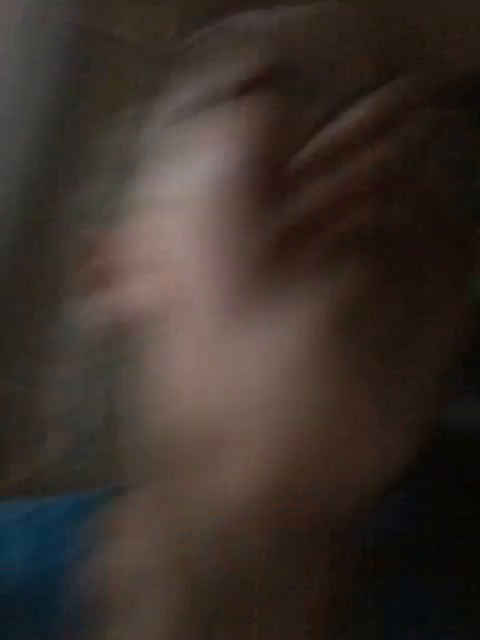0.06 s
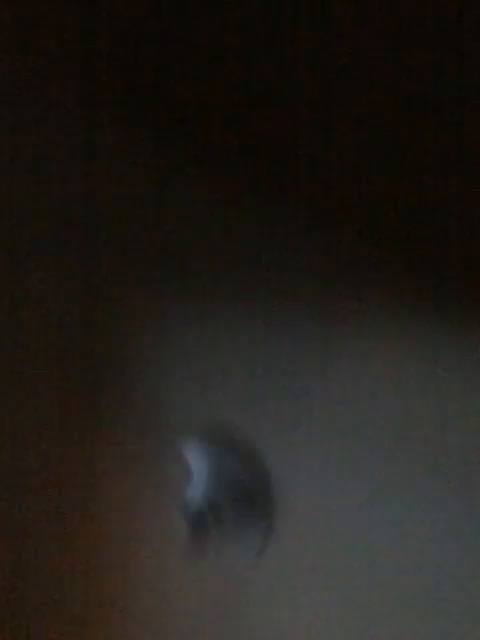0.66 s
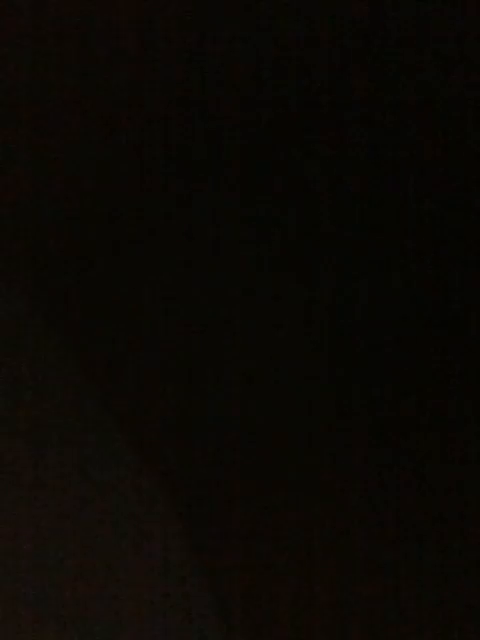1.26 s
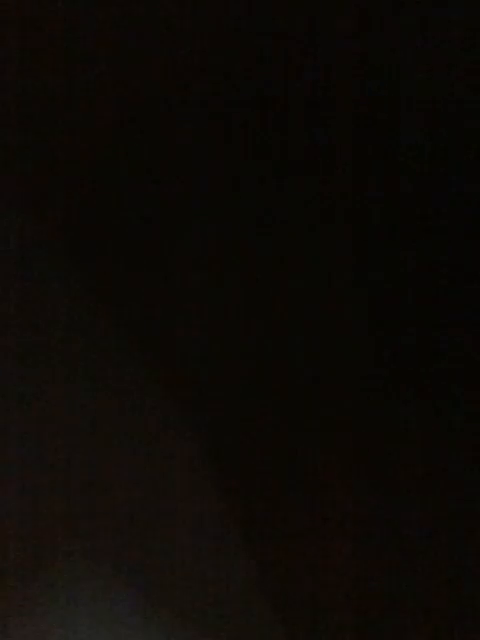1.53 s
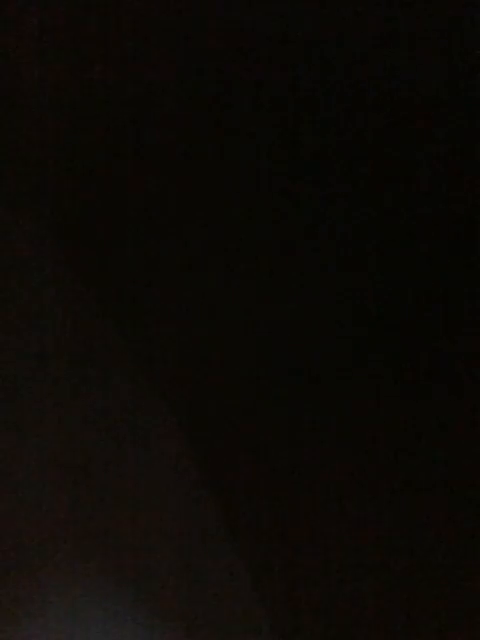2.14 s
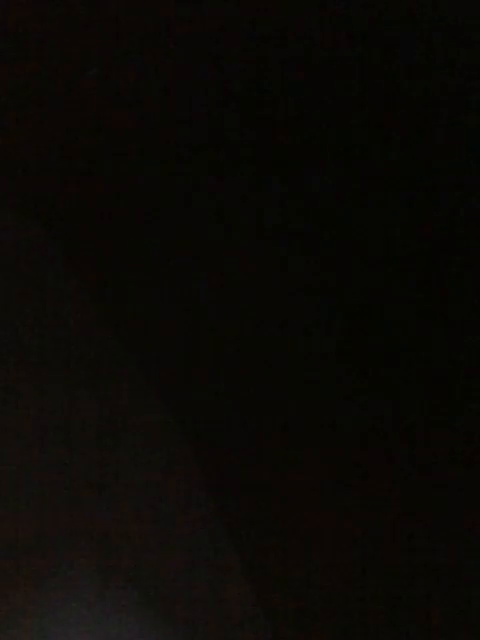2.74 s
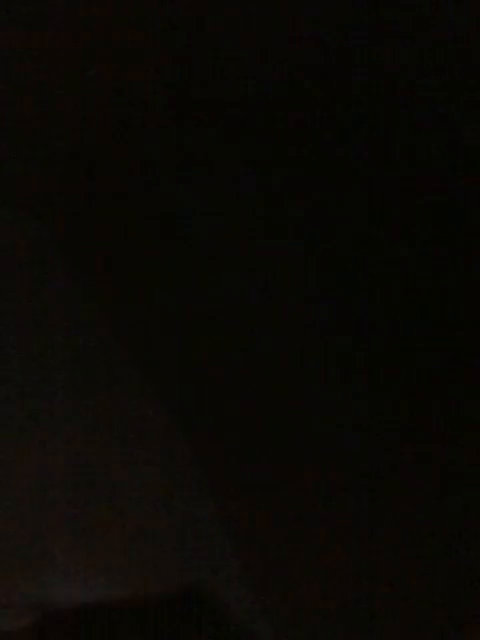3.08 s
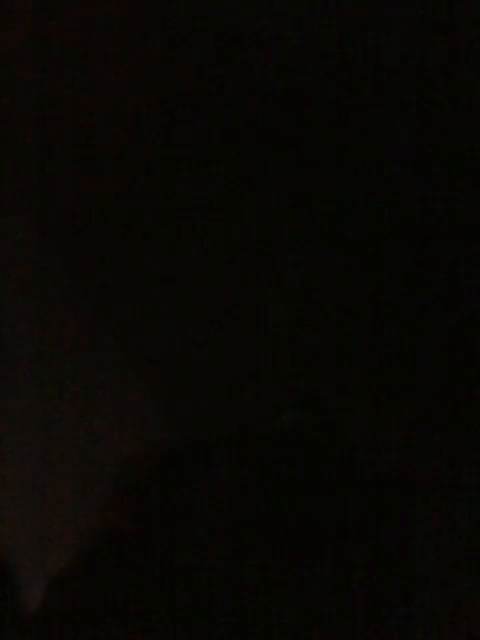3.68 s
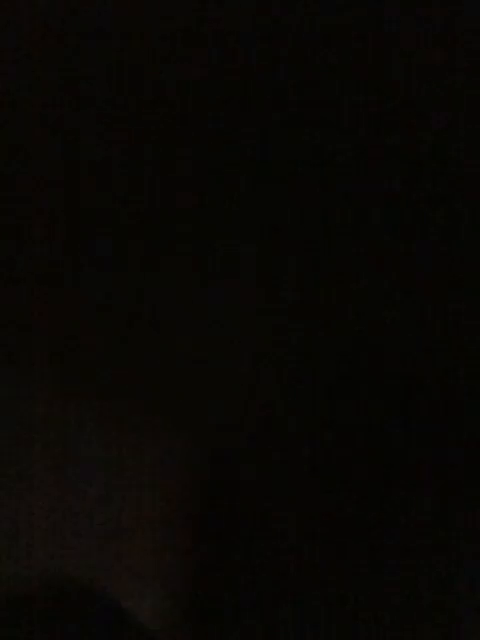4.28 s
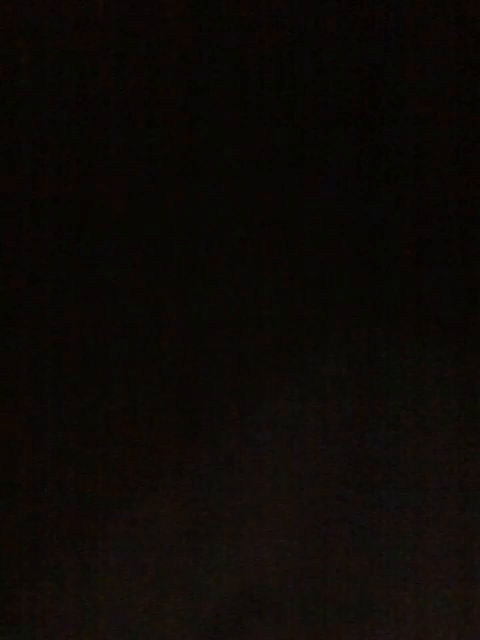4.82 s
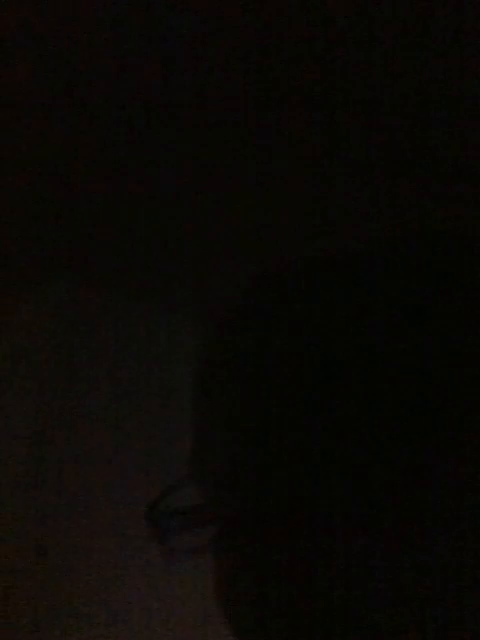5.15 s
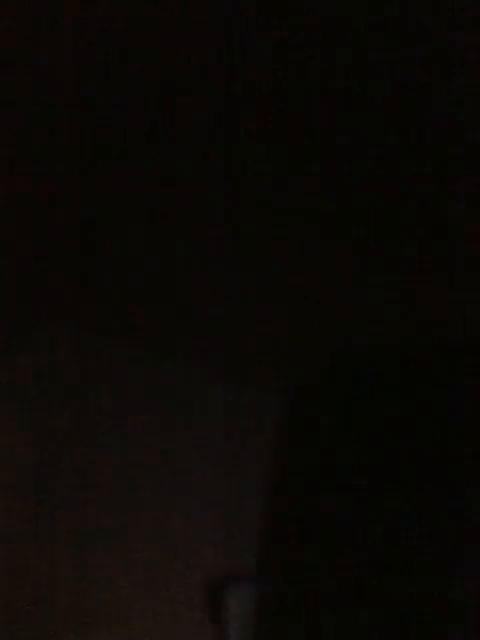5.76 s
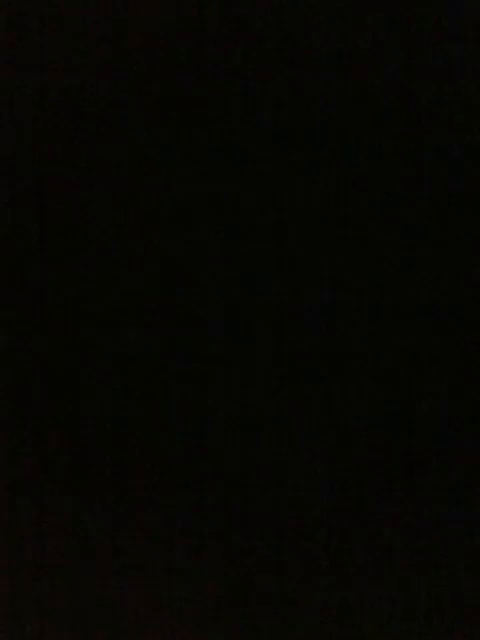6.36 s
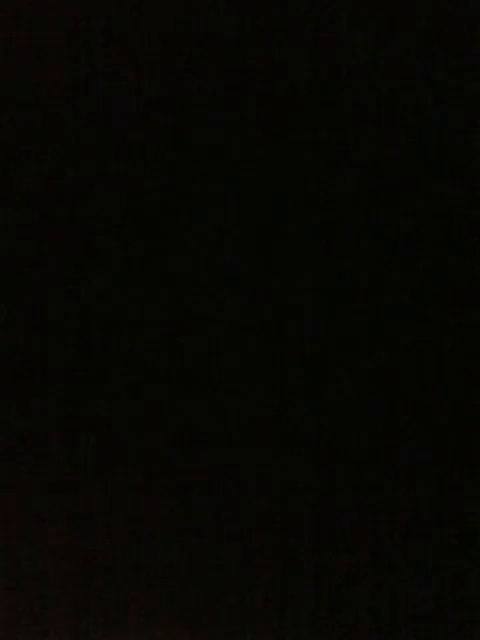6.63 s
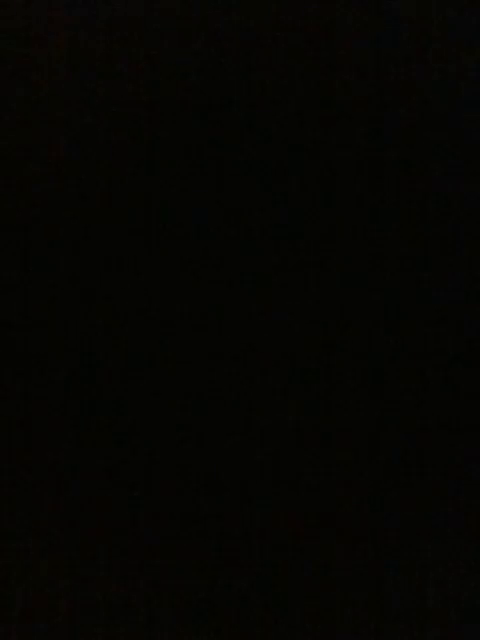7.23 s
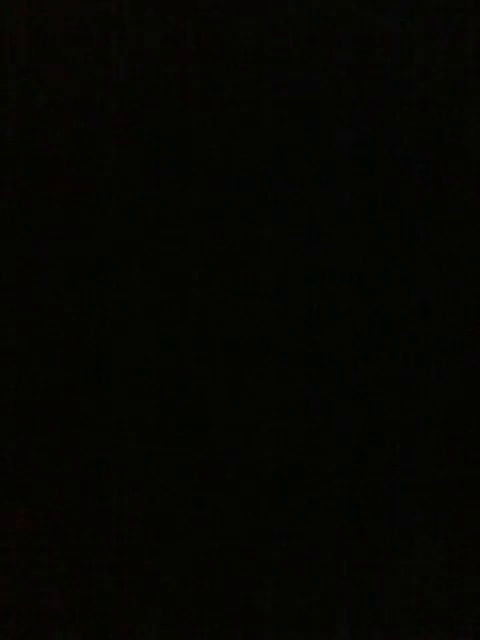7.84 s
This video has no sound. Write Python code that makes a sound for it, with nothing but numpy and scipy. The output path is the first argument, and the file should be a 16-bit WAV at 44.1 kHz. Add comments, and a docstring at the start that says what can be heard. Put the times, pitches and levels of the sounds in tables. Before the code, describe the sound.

Someone climbs into an attic with a phone in hand. Close, dry taps and scratchy swipes on its case come first, mixed with dull thuds on timber. The ladder creaks a little farther off, then a second burst of rubbing and knocking ends in a short squeak of wood. Softer sleeve rustles and taps die away before some last low bumps, over a faint hum and hiss.

```python
"""Knocks and rubs on a phone's case, right at the microphone, as someone climbs into an attic. Fingers tap the
case, which chatters and rings; cloth and skin drag over it and chirp in stick-slip. Hands, knees, feet and the
phone itself thump on ladder and joists, ringing the timber's modes. Loaded joints creak in separate slips, and
one locks into a squeak. A faint low hum and hiss swell and sink underneath."""
import sys
import numpy as np
from scipy import signal
from scipy.fft import rfft, irfft, next_fast_len
from scipy.io import wavfile
from scipy.ndimage import uniform_filter1d

SR = 44100
rng = np.random.default_rng(int(sys.argv[2]) if len(sys.argv) > 2 else 0)


def bounce(signal):
    """Save signal as a 16-bit WAV file at the path given by the first command-line argument."""
    frames = np.transpose(np.atleast_2d(signal))
    limited = np.clip(frames, -1, 1)
    pcm = np.round(limited * 32767).astype(np.int16)
    wavfile.write(sys.argv[1], SR, pcm)


N = 348377
TIME = np.arange(N) / SR

# background swell: t/s, hiss/dB, hum/dB
BACKGROUND_LEVELS = [(0, -52, -63.5), (1.0, -61, -47.5), (1.7, -67.5, -55.5), (2.25, -68.5, -58),
                     (2.7, -59.5, -52), (3.4, -53.5, -47), (4.3, -41.5, -51), (4.8, -58, -55),
                     (5.35, -60.5, -50.5), (6.0, -53.5, -58.5), (6.72, -49.5, -59), (6.95, -61, -62.5),
                     (7.55, -62.5, -69.5), (7.85, -51.5, -63)]
# cloth and skin strokes on the case: start/s, length/s, rub/dB, hiss/dB
CASE_STROKES = [(0, 0.053, -35, -34.5), (0.088, 0.14, -35, -31), (0.286, .11, -37.5, -37),
                (0.411, 0.18, -33.5, -33), (0.646, 0.064, -31.5, -31), (0.714, 0.087, -50, -42.5),
                (0.828, 0.12, -45.5, -47.5), (1.185, 0.15, -49.5, -42), (1.267, 0.37, -55, -53.5),
                (3.045, 0.514, -53.5, -55.5), (3.673, 0.1, -45.5, -42), (3.865, 0.076, -31.5, -41.5),
                (3.966, 0.019, -47, -37.5), (4.05, 0.22, -38.5, -36.5), (4.33, 0.23, -39, -36),
                (4.654, 0.11, -46, -41), (4.997, .27, -47, -45.5), (5.304, 0.048, -49.5, -43.5),
                (5.449, 0.21, -51.5, -50.5), (5.785, 0.2, -47.5, -44), (6.057, 0.091, -40.5, -34),
                (6.195, 0.24, -45, -39), (6.348, .13, -34.5, -30), (6.564, 0.058, -40, -36),
                (6.656, 0.1, -41.5, -33)]
# swipes over the microphone port: centre/s, length/s, rub/dB, hiss/dB
PORT_SWIPES = [(0.16, 0.037, -26.5, -42), (0.568, 0.054, -35.5, -40.5), (1.25, 0.013, -21, -29),
               (4.307, 0.025, -17, -16), (4.419, .014, -24, -38.5), (4.44, 0.014, -18, -18.5),
               (6.457, 0.046, -29.5, -28.5)]
# knocks on the case: t/s, contact/s, level/dB, weight/dB re level, sharpness/dB re level
CASE_KNOCKS = [(0.0575, 0.00214, -17, -4, -9), (0.1675, 0.00191, -23.5, -9.5, 9),
               (.247, 0.0027, -27, -12, 8.5), (0.3352, 0.0015, -20, -11.5, -15),
               (.3862, .0011, -18, -19.5, 5.5), (0.5773, .0012, -15.5, -22.5, 0.5),
               (.6263, .0005, -18, 6.5, 3), (.683, 0.0043, -7, -9, 0), (0.691, .0014, -8.5, -6, -7.5),
               (0.7031, 0.0021, -21.5, 8, 2), (0.8212, 0.0017, -31.5, -6.5, 1.5),
               (1.0107, 0.0045, -34.5, -15, 0), (1.039, 0.0024, -10.5, -4.5, 0.5),
               (1.0797, 0.0032, -5, 0.5, -3), (1.117, 0.0055, -19, -1, 2), (1.248, 0.0038, -30, -7, 9.5),
               (1.2614, 0.0017, -23.5, -6, -2.5), (1.302, .0015, -33, 8.5, 1.5),
               (1.319, .0023, -13, -5, 0.5), (1.3276, 0.0037, -15.5, 9, 2), (1.425, .004, -7.5, 0.5, 3.5),
               (1.4811, .0014, -12.5, -7, -4), (1.5322, 0.00074, -24.5, 5, -4),
               (1.5804, 0.00066, -30.5, 4, 2.5), (1.6137, 0.00077, -38, -2, 6.5),
               (1.719, 0.0013, -46, -13.5, -3), (4.043, 0.0012, -22.5, -3.5, 0.5),
               (4.047, 0.0059, -21.5, -21, -6), (4.0894, 0.00084, -19.5, -6, -3.5),
               (4.1058, 0.00053, -17.5, -31, -5.5), (4.392, 0.00049, -16, -16.5, -1),
               (4.4236, 0.0025, -18.5, -4.5, -2.5), (4.474, 0.001, -26, -4.5, -2),
               (4.5851, 0.0029, -5.5, -2, 4), (4.5975, .0013, -15, -2, -2.5),
               (4.6168, 0.0037, -24, 2.5, 4.5), (4.6299, .0015, -22.5, -16, 3),
               (4.6677, 0.0024, -20, -15.5, 2), (4.688, .0014, -13, 1, -3.5),
               (4.7532, 0.0012, -42, -7.5, 9.5), (4.862, 0.0024, -24, -21, 7),
               (5.521, 0.00057, -13.5, -35, -30), (5.6071, 0.0028, -22.5, -1, -6.5),
               (5.702, 0.0012, -26, -9.5, -7), (5.7802, 0.00047, -24.5, -13.5, -9.5),
               (6.0795, 0.0024, -22, -10.5, -9), (6.201, 0.002, -33.5, -18, -4),
               (6.2147, 0.00051, -32, -26, -6), (6.749, 0.0051, -27.5, 6, -6),
               (6.8406, 0.00039, -39, -9.5, -11)]
# fingertip stick-slip: centre/s, length/s, f/Hz, level/dB
FINGER_CHIRPS = [(0.1227, 0.0059, 3835, -5), (0.126, 0.0046, 4300, -17), (0.202, 0.025, 3530, -23.5),
                 (1.252, 0.0091, 1287, -14), (5.978, 0.0041, 287, -21.5), (6.522, 0.0024, 815, -41),
                 (6.538, 0.0031, 880, -28), (6.568, 0.0056, 667, -22.5), (6.628, 0.011, 838, -28),
                 (6.669, 0.0094, 685, -30.5), (6.706, 0.0047, 504, -26.5)]
# blows on the timber, from limbs and from the phone itself: t/s, t60/s, boom f/Hz, boom/dB, wood/dB, crack/dB
TIMBER_BLOWS = [(.688, .17, 127.8, -18.5, -38, -48.5), (1.085, 0.083, 128.7, -29, -33, -45),
                (1.121, 0.24, 85.7, -28, -41, -58), (1.264, 0.17, 115.5, -38.5, -54.5, -52.5),
                (1.335, 0.37, 106.7, -26, -44, -46.5), (1.438, 0.47, 107.5, -26, -21.5, -57.5),
                (1.534, .25, 100.8, -28, -33, -35), (1.84, 0.43, 80.3, -42, -38, -34),
                (1.99, 0.45, 89.8, -48.5, -51.5, -47.5), (2.072, 0.25, 135, -26, -16.5, -34),
                (2.085, 0.4, 115, -26.5, -39, -31), (2.828, .4, 91.7, -33.5, -40, -59),
                (2.966, 0.35, 129, -36, -38.5, -44.5), (3.046, 0.75, 99, -44, -45, -41.5),
                (3.665, 0.19, 70, -37.5, -41.5, -39), (3.895, 1, 125, -33, -34.5, -42),
                (3.955, .15, 90, -28, -58, -66.5), (4.046, 0.58, 85, -22.5, -31, -42),
                (4.173, 0.81, 90, -29, -27.5, -53.5), (4.388, 0.083, 95, -31.5, -32, -48.5),
                (4.592, 0.16, 121, -15.5, -19.5, -45), (4.672, 0.12, 186.4, -24, -25.5, -35.5),
                (4.888, 0.11, 110, -27.5, -13.5, -40.5), (4.899, 0.3, 110.2, -24, -15, -30.5),
                (6.752, 0.087, 134.6, -45, -49, -67), (7.14, 0.51, 50, -58, -71, -80.5),
                (7.63, 0.48, 151, -35, -34.5, -53.5), (7.771, 0.52, 163, -31, -29, -48.5),
                (7.84, 0.21, 163, -30.5, -32.5, -66)]
# slip runs of a ladder joint: start/s, length/s, first gap/s, gap ratio per slip, level/dB
SLIP_RUNS = [(2.086, .1, .018, 1.0, -26), (2.362, .15, 0.061, 1.13, -47.5), (3.054, .025, 0.017, 1.0, -38),
             (3.14, .1, .0185, .92, -32.5), (3.262, .135, .0102, 1.115, -34),
             (3.404, .06, 0.019, 0.94, -34.5)]
# squeak of a rubbing joint: t/s, f/Hz, level/dB
SQUEAK_PATH = [(4.972, 620, -40), (4.986, 670, -25), (5.02, 720, -23), (5.04, 915, -22), (5.065, 992, -22),
               (5.09, 955, -29), (5.15, 890, -52)]
# timber's radiation of the squeak: f/Hz, gain/dB
SQUEAK_RESPONSE = [(600, -9.5), (950, -2.5), (1400, -5), (1900, -5), (2900, -17), (3900, -19.5),
                   (4700, -16.5), (5900, -29)]

# modes of timber and ladder joint: f/Hz, level/dB, t60/s
TIMBER_MODES = [(60.6, -6, 0.56), (74.6, -11.5, 0.67), (87.38, -9.5, 0.15), (112, -9, 0.25),
                (130.7, -0.5, 0.13), (146.4, -8, 0.59), (192, -6.5, 0.41), (244.9, 0.5, 0.37),
                (275.6, -5.5, 0.38), (327.7, -2, 0.23), (401, -9.5, 0.37), (452.7, 1.5, 0.046),
                (503, -2.5, 0.17), (727, -10.5, 0.32), (872, -3, 0.12), (1038, 0.5, .15), (1203, -5.5, .14),
                (1739, -18, 0.19), (2040, -12.5, .2)]
JOINT_MODES = [(203.5, -11.5, 0.068), (293, -8, 0.052), (474, -5.5, 0.035), (968, 0, 0.037),
               (1131, -7.5, 0.038), (1275, -10, 0.025), (1620, -22, 0.0098), (1970, -21.5, .015),
               (2715, -28.5, 0.0083), (3950, -4, 0.01), (4470, -4.5, 0.0162), (5130, -18.5, 0.013)]

# noise spectra: f/Hz, relative density/dB
BACKGROUND_SPECTRUM = [(25, -7), (60, -6), (80, -6.5), (135, -11), (200, -21), (400, -19.5), (750, -22.5),
                       (1000, -25), (3000, -29.5), (4100, -24), (5500, -30.5), (10000, -31.5), (16000, -33)]
RUB_SPECTRUM = [(100, -17), (400, -7), (680, -1), (1050, -6), (1700, -5), (2400, -8.5), (3400, -22)]
HISS_SPECTRUM = [(1500, -20.5), (2800, -4), (3800, 1.5), (4800, 5.5), (6000, -5), (8500, -12.5),
                 (12000, -19), (16000, -27)]
SWIPE_SPECTRUM = [(150, -5), (500, -4.5), (1300, -1.5), (2200, -9), (3200, -14.5)]
CASE_SPECTRUM = [(70, 0), (250, 7), (600, 9), (1000, -9), (1700, -2.5), (2700, -1), (3700, -2), (4900, 0.5),
                 (6000, -10.5), (8500, -13.5), (12000, -18.5), (16000, -13)]
WOOD_SPECTRUM = [(50, 0.5), (120, 4), (250, -3), (500, -11), (1000, -12), (2500, -18), (4500, -12.5),
                 (6500, -29.5), (12000, -42)]
RUMBLE_SPECTRUM = [(25, -5), (55, 4), (105, 2), (170, -8), (350, -11.5)]
ATTIC_SPECTRUM = [(80, 7.5), (1000, -4), (5000, -8), (12000, -11)]


def from_db(db):
    """Decibels to gain."""
    return 10 ** (np.asarray(db) / 20)


def unit_rms(x):
    """Scale to unit power."""
    return x / np.sqrt(np.mean(x ** 2) + 1e-20)


def per_sample(rows):
    """Interpolate each column of a time curve."""
    times_s, *columns = np.transpose(rows)
    return [np.interp(TIME, times_s, column) for column in columns]


def add(out, at_s, sound):
    """Mix a sound in at a time."""
    i = max(0, round(at_s * SR))
    out[i:i + len(sound)] += sound[:max(0, N - i)]


def band(x, low_hz, high_hz):
    """Band-pass."""
    edges_hz = [low_hz, min(high_hz, SR / 2 - 1000)]
    return signal.sosfilt(signal.butter(2, edges_hz, "band", fs=SR, output="sos"), x)


def dulled(x, top_hz):
    """Low-pass: a softer contact carries less treble."""
    return signal.lfilter(*signal.butter(2, min(top_hz, SR / 2 - 1000), fs=SR), x)


def coloured(x, spectrum):
    """Shape noise to a spectrum, rolled off past its ends; unit power."""
    hz, db = np.transpose(spectrum)
    size = next_fast_len(len(x))
    bin_hz = np.arange(size // 2 + 1) * SR / size + 1e-3
    gain = from_db(np.interp(np.log(bin_hz), np.log(hz), db))
    skirts = np.minimum(1, bin_hz / hz[0]) ** 2 * np.minimum(1, hz[-1] / bin_hz) ** 2
    return unit_rms(irfft(rfft(x, size) * gain * skirts, size)[:len(x)])


def drift(rate_hz):
    """Random wander; unit power."""
    return unit_rms(np.interp(TIME * rate_hz, np.arange(40000), rng.standard_normal(40000)))


def balance(parts, levels_db, span_s):
    """Sum the parts of a blow, each set to its RMS level over the first span_s."""
    return sum(from_db(db) * part / np.sqrt(np.mean(part[:int(span_s * SR)] ** 2) + 1e-20)
               for part, db in zip(parts, levels_db))


def struck(modes, t, scatter_db=3):
    """Decaying modes, with a new strength and sign on every blow."""
    hz, db, t60_s = np.transpose(modes)[:, :, None]
    strength = from_db(db + scatter_db * rng.standard_normal(hz.shape)) * rng.choice([-1, 1], hz.shape)
    return np.sum(strength * from_db(-60 * t / t60_s) * np.sin(2 * np.pi * hz * t), axis=0)


def background(hum_hz=102, whine_hz=4000, whine_re_hiss_db=-16):
    """Hiss, a low hum and a faint high whine that sink and swell."""
    hiss_db, hum_db = per_sample(BACKGROUND_LEVELS)
    hum = unit_rms(band(rng.standard_normal(N), hum_hz - 5, hum_hz + 5))
    whine = unit_rms(band(rng.standard_normal(N), whine_hz - 12, whine_hz + 12))
    hiss = coloured(rng.standard_normal(N), BACKGROUND_SPECTRUM)
    return from_db(hum_db) * hum + from_db(hiss_db) * (hiss + from_db(whine_re_hiss_db) * whine)


def stroke_envelopes(attack_share=0.12, release_s=0.018, rub_slope_db=-3.5, hiss_slope_db=-2.5):
    """Rub and hiss gains: each stroke sets in, eases as it slides, and lets go."""
    rub_env, hiss_env = np.zeros(N), np.zeros(N)
    for start_s, length_s, rub_db, hiss_db in CASE_STROKES:
        t = TIME[:int((length_s + .25) * SR)]
        attack = 1 - np.exp(-t / (attack_share * length_s))
        shape = attack * np.exp(-np.maximum(t - length_s, 0) / release_s)
        progress = np.minimum(t / length_s, 1) - .5
        add(rub_env, start_s, shape * from_db(rub_db + rub_slope_db * progress))
        add(hiss_env, start_s, shape * from_db(hiss_db + hiss_slope_db * progress))
    return rub_env, hiss_env


def friction(spectrum, grain_db, flutter_db):
    """Fibres catch and let go: grainy noise under uneven pressure."""
    grains = rng.standard_normal(N) * from_db(grain_db * drift(1500))
    return unit_rms(coloured(grains, spectrum) * from_db(flutter_db * drift(110)))


def rubbing(rub_env, hiss_env, rub_trim_db=-0.5, hiss_trim_db=-2):
    """Sleeve and fingers drag over the case and swipe across the port."""
    swipe_env = 0
    for centre_s, length_s, rub_db, hiss_db in PORT_SWIPES:
        flat_top = 1 / (1 + (2 * (TIME - centre_s) / length_s) ** 4)
        swipe_env = swipe_env + from_db(rub_db) * flat_top
        hiss_env = hiss_env + from_db(hiss_db) * flat_top
    rub = rub_env * friction(RUB_SPECTRUM, grain_db=0.5, flutter_db=5)
    swipe = swipe_env * friction(SWIPE_SPECTRUM, grain_db=-2.5, flutter_db=5.5)
    hiss = hiss_env * friction(HISS_SPECTRUM, grain_db=2, flutter_db=4)
    return from_db(rub_trim_db) * rub + swipe + from_db(hiss_trim_db) * hiss


def rumble(rub_env, settle_s=0.21, full_rub_db=-22.5, exponent=0.59):
    """The hand shakes the phone, more so the harder it rubs."""
    effort = np.maximum(uniform_filter1d(rub_env, int(settle_s * SR)), 1e-6)
    return from_db(full_rub_db) * effort ** exponent * coloured(rng.standard_normal(N), RUMBLE_SPECTRUM)


def rebounds(above_db=-17, gap_s=0.0035, loss_db=11.5, extra_weight_db=3.5):
    """Hard knocks land a second time, softly; rows as in CASE_KNOCKS."""
    return [(at_s + contact_s / 2 + gap_s, contact_s / 2, db - loss_db,
             weight_db + extra_weight_db, sharp_db)
            for at_s, contact_s, db, weight_db, sharp_db in CASE_KNOCKS
            if db > above_db and contact_s > .0013]


def snags(hiss_env, tries=70, re_hiss_db=-4.5, spread_db=5, contact_s=0.00087, weight_db=-5):
    """Seams catch on the case at random during strokes; rows as in CASE_KNOCKS."""
    samples = rng.integers(0, N, tries)
    offsets_db = rng.normal(re_hiss_db, spread_db, tries)
    return [(i / SR, contact_s, 20 * np.log10(hiss_env[i]) + offset_db, weight_db, 0)
            for i, offset_db in zip(samples, offsets_db) if hiss_env[i] > 1e-4]


def knocks(hiss_env, ring_db=-24, ring_t60_s=0.0087, body_t60_s=.011, band_ratio=1.846,
           lead_s=.003, trim_db=-1, body_trim_db=-2):
    """A touch presses in and chatters on the case; brief ones are crisp, the body rings longest."""
    out, t = np.zeros(N), TIME[:SR // 16] - lead_s
    for at_s, contact_s, db, weight_db, sharp_db in list(CASE_KNOCKS) + rebounds() + snags(hiss_env):
        body_db, click_db = db + weight_db + body_trim_db, db + sharp_db
        ring_hz = 1019 * 2 ** (-weight_db / 24)   # a heavier touch damps the case: lower ring
        force_db = (body_db + click_db) / 2
        top_hz = 9300 * 2 ** ((force_db + 25) / 43)   # a firmer touch reaches higher
        rise_s = 0.00031 + 0.29 * contact_s
        press = np.exp(np.minimum(t / rise_s - 1, 0))
        noise = press * coloured(rng.standard_normal(len(t)), CASE_SPECTRUM)
        after_s = np.maximum(t - contact_s * 0.89, 0)
        contact_decay = from_db(-60 * after_s / (0.001 + contact_s))
        chatter = noise * (contact_decay + from_db(ring_db - 60 * after_s / ring_t60_s))
        body = band(noise * from_db(-60 * after_s / body_t60_s), 66, 550)
        ring = band(chatter, ring_hz / band_ratio, ring_hz * band_ratio)
        click = dulled(band(chatter, 2500, 15000), top_hz)
        knock = balance((body, ring, click), (body_db, db, click_db), lead_s + contact_s + 0.00047)
        add(out, at_s - lead_s, from_db(trim_db) * knock)
    return out


def chirps(jitter=.085):
    """Skin grips and slips briefly at a wavering pitch."""
    out = np.zeros(N)
    clock_s = TIME + jitter * np.cumsum(drift(1200)) / SR
    grip = from_db(3 * drift(900) - 1)
    for centre_s, length_s, hz, db in FINGER_CHIRPS:
        span = np.abs(TIME - centre_s) < 2 * length_s
        envelope = from_db(db) * np.exp(-3.4 * ((TIME[span] - centre_s) / length_s) ** 2)
        out[span] += envelope * np.sin(2 * np.pi * hz * clock_s[span])
    return out * grip


def thumps(modes_db=-4, crack_t60_share=0.33, tail_db=-22, tail_t60_s=0.33, crack_tail_t60_s=0.62,
           rise_s=.0015, band_ratio=1.6):
    """A blow rings the timber's main and lesser modes; the crack drops fast to a faint bright tail."""
    out, t = np.zeros(N), TIME[:SR // 2]
    for at_s, t60_s, boom_hz, boom_db, wood_db, crack_db in TIMBER_BLOWS:
        hardness_db = (wood_db + crack_db) / 2 - boom_db
        top_hz = max(500, 1800 * 2 ** (hardness_db / 5.5))   # softer blows are duller
        lesser = coloured(rng.standard_normal(len(t)), WOOD_SPECTRUM) * np.minimum(t / rise_s, 1)
        modes = from_db(modes_db - 20 * t / t60_s) * struck(TIMBER_MODES, t)
        body = modes + lesser * (from_db(-60 * t / t60_s) + from_db(tail_db - 60 * t / tail_t60_s))
        boom = band(body, boom_hz / band_ratio, boom_hz * band_ratio)
        wood = dulled(band(body, 180, 1900), top_hz)
        crack_decay = from_db(-60 * t / (t60_s * crack_t60_share))
        crack_tail = from_db(tail_db - 60 * t / crack_tail_t60_s)
        crack = band(lesser * (crack_decay + crack_tail), 1700, 11000)
        add(out, at_s, balance([boom], [boom_db], span_s=.05))
        add(out, at_s, balance((wood, crack), (wood_db, crack_db), span_s=0.014))
    return out


def slips(onset_db=-2, onset_s=0.011, scatter_db=3.5, fade_db=1.03):
    """A loaded joint slips in runs, each slip relieving it and weakening the next; yields t/s, dB."""
    for start_s, length_s, gap_s, gap_ratio, db in SLIP_RUNS:
        at_s = start_s
        while at_s < start_s + length_s:
            held_db = onset_db * np.exp((start_s - at_s) / onset_s)   # load still building
            yield at_s, db + held_db + scatter_db * rng.standard_normal()
            at_s += gap_s * rng.normal(1, .02)
            gap_s = max(gap_s * gap_ratio, .005)
            db -= fade_db


def creaks(ring_db=-3, snap_db=-2, snap_t60_s=0.011, timber_db=-16):
    """Each slip is a dry snap that rings the joint's modes and shakes the timber."""
    out, t = np.zeros(N), TIME[:SR // 4]
    for at_s, db in slips():
        snap = band(rng.standard_normal(len(t)) * from_db(-60 * t / snap_t60_s), 450, 4000)
        ring = struck(JOINT_MODES, t)
        shake = band(struck(TIMBER_MODES, t), 40, 220)
        add(out, at_s, balance((ring, snap), (db + ring_db, db + snap_db), span_s=0.0007))
        add(out, at_s, balance([shake], [db + timber_db], span_s=0.017))
    return out


def squeak(lock_s=5.07, rasp_s=.1, jitter=0.136, shimmer_db=6, trim_db=-0.5,
           judder_s=5.078, judder_width_s=0.04, judder_db=-35):
    """Stick-slip locks from a rasp into a rising, falling tone; the board judders as it lets go."""
    hz, level_db = per_sample(SQUEAK_PATH)
    roughness = np.minimum(.05 + ((TIME - lock_s) / rasp_s) ** 2, .9)
    phase = 2 * np.pi * np.cumsum(hz * (1 + jitter * roughness * drift(900))) / SR
    response_hz, response_db = np.transpose(SQUEAK_RESPONSE)
    tone = np.zeros(N)
    for k in range(1, 7):
        harmonic_db = np.interp(k * hz, response_hz, response_db) + shimmer_db * roughness * drift(400)
        tone += from_db(harmonic_db) * np.sin(k * phase)
    letting_go = np.exp(-np.minimum(((TIME - judder_s) / judder_width_s) ** 2, 50))
    judder = from_db(judder_db) * letting_go * unit_rms(band(rng.standard_normal(N), 180, 430))
    sliding = (TIME > SQUEAK_PATH[0][0]) & (TIME < SQUEAK_PATH[-1][0])
    return judder + tone * from_db(trim_db + level_db - 2 * roughness) * sliding


def attic(x, t60_s=0.14, delay_s=.004):
    """Diffuse reflections from boards and rafters."""
    t = TIME[:SR // 2]
    tail = coloured(rng.standard_normal(len(t)), ATTIC_SPECTRUM)
    tail *= from_db(-60 * t / t60_s) * (t > delay_s)
    return signal.fftconvolve(x, tail / np.sqrt(np.sum(tail ** 2)))[:N]


def scene(handling_send_db=-22, creak_send_db=-9, squeak_send_db=-5):
    """Handling is close and nearly dry; creaks and squeak are farther off and wetter. Mono."""
    rub_env, hiss_env = stroke_envelopes()
    low = thumps() + rumble(rub_env) + background()
    squeaking = squeak()
    handling = rubbing(rub_env, hiss_env) + chirps() + knocks(hiss_env)
    creaking = creaks()
    room = attic(from_db(handling_send_db) * handling + from_db(creak_send_db) * creaking
                 + from_db(squeak_send_db) * squeaking)
    return (handling + creaking + squeaking + low + room)[None]


def record(dry, cutoff_hz=15800):
    """The hardest knocks overload the microphone; the top is cut."""
    lowpass = signal.ellip(10, .1, 70, cutoff_hz, fs=SR, output="sos")
    return signal.sosfilt(lowpass, np.clip(dry, -1, 1))


dry = scene()
out = record(dry)
bounce(out)
```